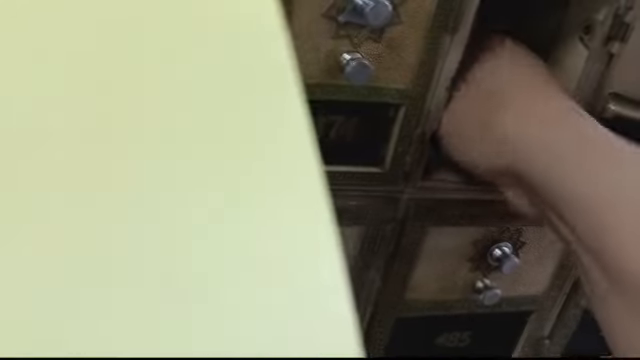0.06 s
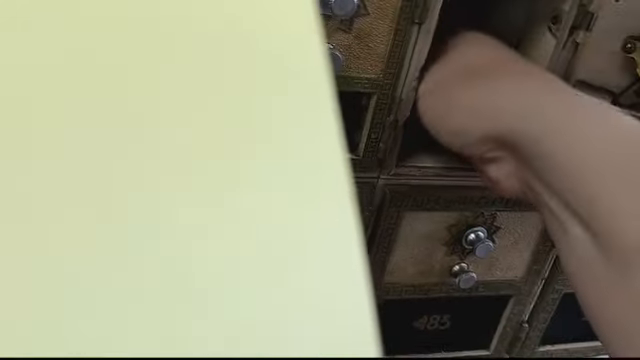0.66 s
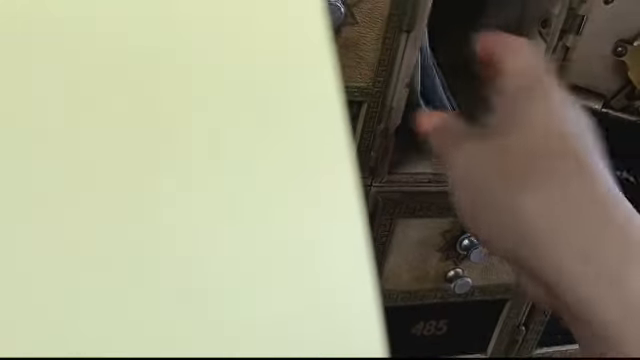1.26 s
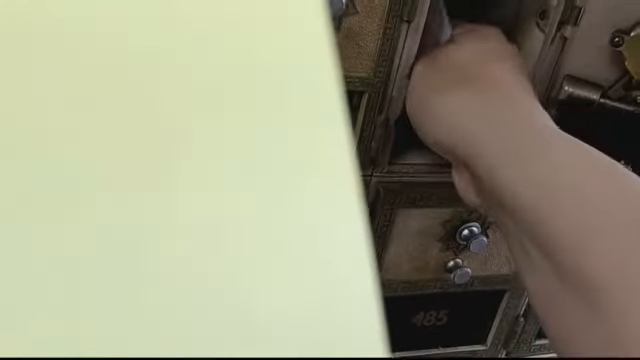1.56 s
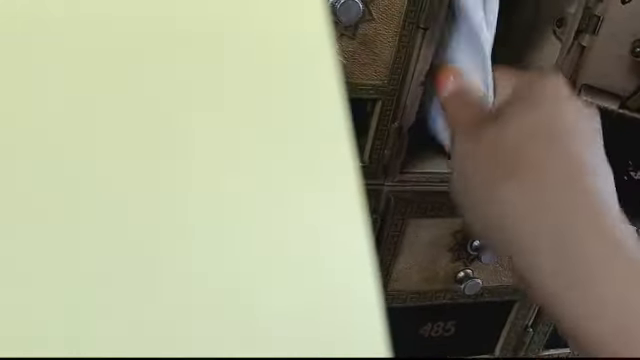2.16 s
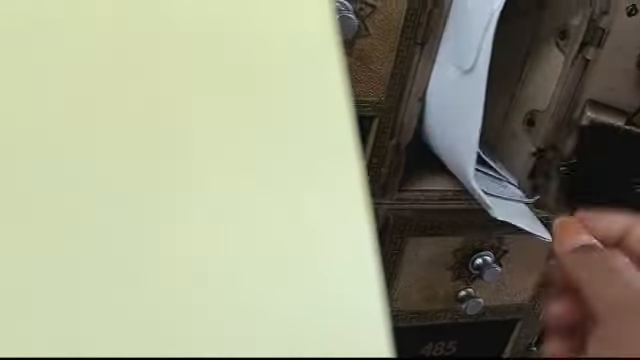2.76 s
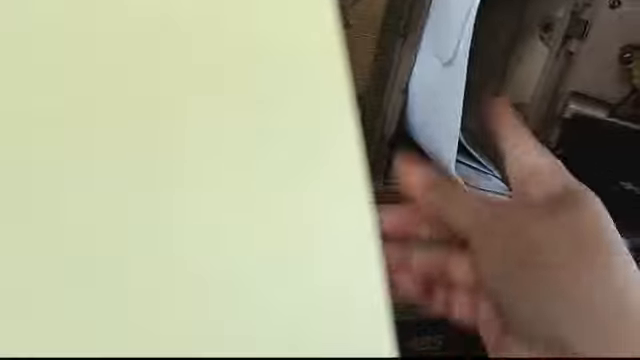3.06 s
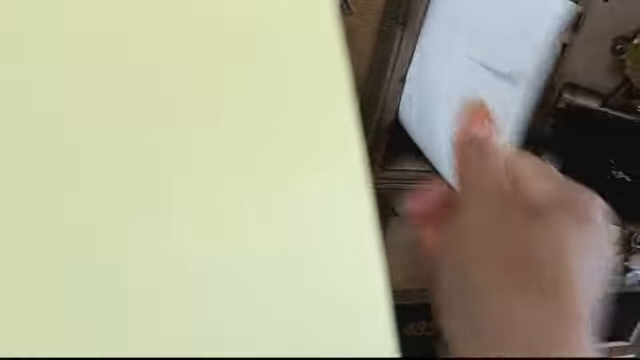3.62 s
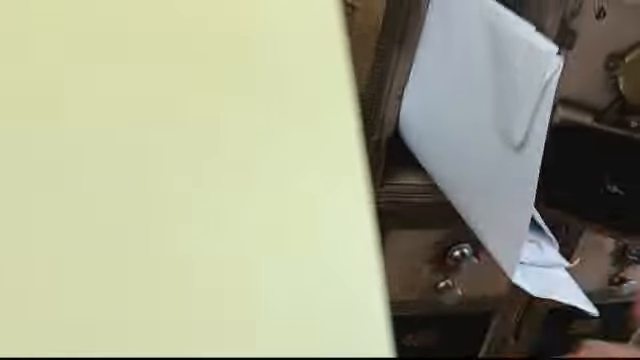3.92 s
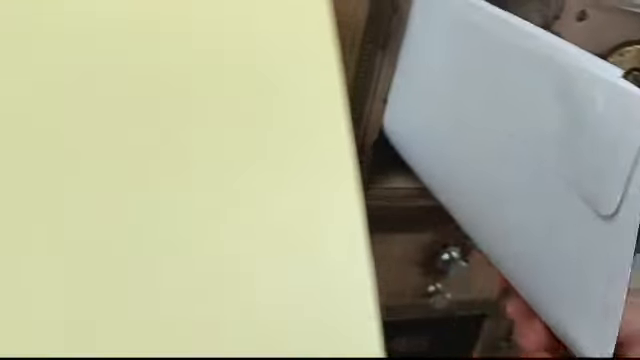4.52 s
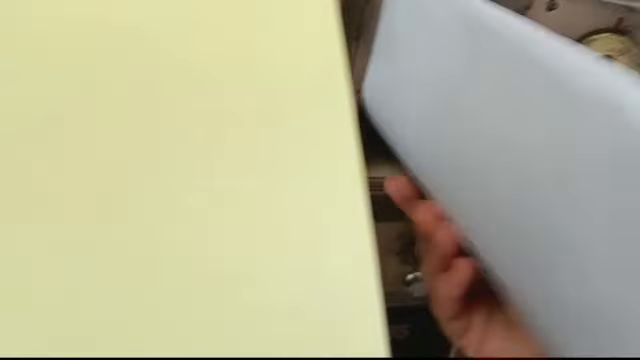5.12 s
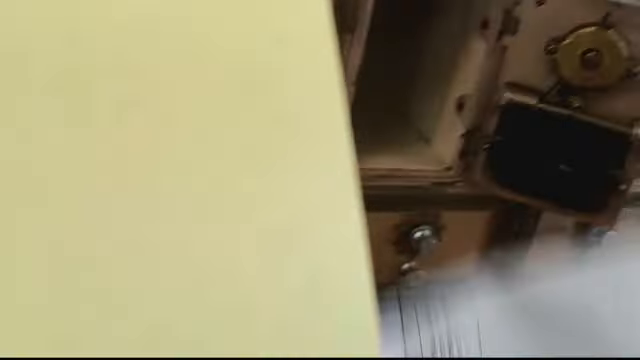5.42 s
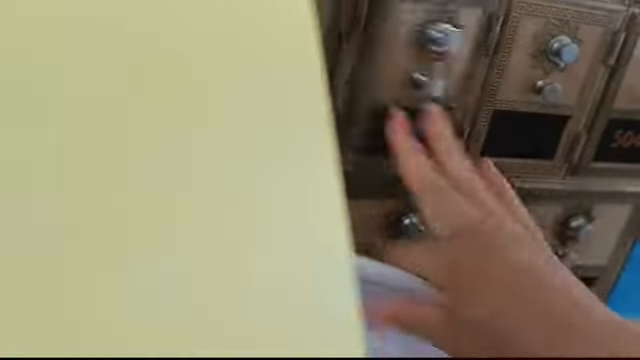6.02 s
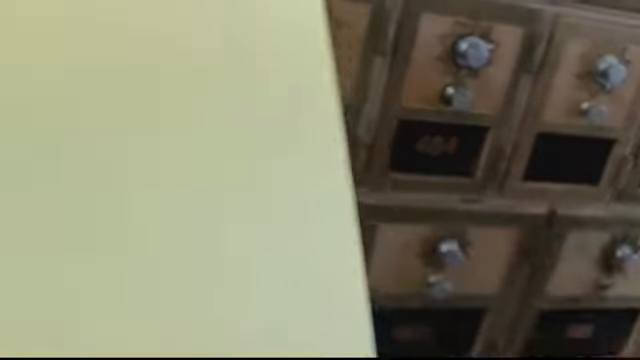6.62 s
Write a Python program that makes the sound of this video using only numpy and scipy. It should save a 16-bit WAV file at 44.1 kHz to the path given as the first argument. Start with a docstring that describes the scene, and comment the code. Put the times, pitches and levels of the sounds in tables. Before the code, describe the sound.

Close to the microphones in a quiet lobby, a hand tugs a bundle of mail from a metal mailbox. Paper slides along the inner walls, crackling and snapping irregularly, while the hand and bundle bump softly on the hollow box. After a couple of louder, fuller swishes, the small door shuts with a click, a tight thud and a short metallic rattle, followed by a faint last rustle.

```python
"""A lobby, two microphones close to a small brass mailbox. A hand works envelopes out of it: paper slides
on the inner walls, edges and creases snap, a corner taps the brass, the bundle knocks on the hollow box.
From about 4 s the paper rubs over the frame and sounds more open. At 6 s the little door is slapped shut,
the doors around it rattle, and the paper rustles once more."""
import sys
import numpy as np
from scipy import signal
from scipy.fft import rfft, irfft, next_fast_len
from scipy.io import wavfile

SR = 44100
rng = np.random.default_rng(int(sys.argv[2]) if len(sys.argv) > 2 else 0)


def materialize(psi):
    """Save the field psi as 16-bit PCM at rate SR to the path in sys.argv[1].

    A 1-D psi becomes a single channel; in a 2-D psi each row is a channel.
    """
    bounded = np.clip(np.atleast_2d(psi).T, -1, 1)
    quanta = np.round(bounded * 32767).astype(np.int16)
    wavfile.write(sys.argv[1], SR, quanta)


N = 298998
TIME = np.arange(N) / SR

# pushes and pulls that slide the paper: start_s, swell_s, ease_s, level_db, bass_offset_db, fizz_offset_db
PAPER_STROKES = [(0, 0.018, 0.11, -46, 11, -5), (0.143, 0.011, 0.071, -44, 5.5, -0.5),
                 (.23, 0.023, 0.22, -44, 7, -9), (0.383, 0.051, 0.011, -35, -2, -6),
                 (0.471, 0.17, 0.033, -41.5, 2.5, -4.5), (0.588, 0.27, 0.016, -37, -5, -1.5),
                 (0.869, 0.058, 0.069, -41.5, 6, -3), (1.355, 0.024, 0.098, -48.5, -12, -10),
                 (1.408, 0.11, 0.27, -42.5, 2, -10), (1.763, 0.024, .12, -44.5, 16, -7),
                 (1.82, 0.094, 0.15, -38.5, 1.5, -5), (1.995, .028, 0.0076, -31.5, -2.5, -6.5),
                 (2.05, 0.15, 0.095, -34.5, -0.5, -7), (2.422, .12, 0.025, -40, -3.5, -2),
                 (2.56, 0.019, 0.11, -43, 2.5, 0), (3.034, 0.22, 0.074, -35, -4.5, -2),
                 (3.44, 0.07, 0.34, -43.5, -3, -5.5), (3.64, 0.11, 0.1, -34.5, -2, -3),
                 (3.869, 0.017, 0.14, -59, -9, -8), (4.133, 0.06, 0.04, -52, -13, 3.5),
                 (4.196, 0.038, 0.0073, -36, -3.5, -6.5), (4.267, 0.076, 0.15, -34, -3, -6),
                 (4.553, 0.027, 0.2, -39, -25.5, -2.5), (4.78, 0.13, 0.021, -24.5, -7.5, -11.5),
                 (4.92, 0.093, 0.41, -43.5, -10, -1), (5.161, 0.092, 0.06, -23, -9.5, -10.5),
                 (5.32, 0.022, 0.12, -47, -15, -17), (5.482, 0.027, 0.036, -45, -41, -9.5),
                 (5.6, 0.084, 0.13, -62.5, -0.5, -13), (6.5, 0.052, 0.069, -64, 8.5, 0.5),
                 (6.633, 0.014, 0.25, -46, -14.5, 1)]
# where the paper rubs: time_s, position (0 deep in the box, 1 out at the frame)
PAPER_POSITION = [(0, 0.082), (1.0, 0.15), (2.0, 0.18), (3.7, 0.19), (4.35, .7), (4.9, 0.64)]
# the fingers bend the bundle and it crinkles instead of sliding: start_s, end_s, share (0-1)
BUNDLE_BENDS = [(.14, .4, .4), (1.42, 2.55, .3), (3.035, 3.42, .55), (4.14, 4.3, .4)]
# resonances of the box's air and walls: pitch_hz, gain_db, t60_s
BOX_RESONANCES = [(405.7, 6.5, 0.067), (793, -2, 0.018), (1109, -13, 0.033), (2266, -17.5, 0.34),
                  (3600, -11, 0.57)]
# edges and creases snapping: start_s, energy_db, bass_offset_db, fizz_offset_db, pitch_hz, decay_s
PAPER_SNAPS = [(0.151, -38, -10, -2, 3840, .004), (0.3317, -27, -25, -6, 2480, 0.0036),
               (0.4278, -20.5, -14, -20, 2230, .003), (0.9035, -24.5, -1.5, 3, 3770, 0.0018),
               (0.9811, -27, -1, -7.5, 2920, 0.015), (1.0331, -30, -4.5, -26, 2170, 0.0047),
               (1.1682, -42.5, -41, 0.5, 1690, 0.0035), (1.4, -37.5, -35.5, 0, 2630, 0.009),
               (1.463, -31.5, -26, -4, 2430, 0.0032), (1.4834, -36.5, 2, -2, 2130, 0.00088),
               (1.5827, -18, -5.5, -21, 1520, 0.00085), (1.721, -37, 7.5, -5, 2550, .002),
               (1.823, -14, -8.5, -10.5, 2440, 0.0015), (1.965, -24, -12, -8.5, 1850, 0.00099),
               (2.022, -13.5, -9, -7.5, 1860, .0026), (2.0236, -17, 4, -7, 1113, 0.0036),
               (2.1299, -10, -12, -9.5, 2020, 0.0018), (2.1788, -19, -9.5, -13.5, 1630, .0007),
               (2.2985, -29, -1.5, 3, 1830, 0.0024), (2.361, -24, -10, -7, 2220, 0.0004),
               (2.3682, -30, -4, 1.5, 5000, 0.00035), (2.423, -23, -1.5, -8.5, 1650, 0.0023),
               (2.4687, -17.5, -11.5, -9, 5700, 0.0009), (2.5261, -16.5, -17, -12, 3480, 0.0034),
               (2.5395, -22.5, -21, -3, 5620, 0.0064), (2.673, -17, -5, -14, 2250, 0.0011),
               (2.68, -27, -5, -10.5, 2330, 0.0017), (3.0337, -28, -27, -21, 2670, 0.001),
               (3.0844, -32.5, -28, -5, 3200, .002), (3.1882, -27.5, -20, -0.5, 2370, 0.0018),
               (3.2085, -18.5, -14, -10, 2080, 0.0011), (3.229, -24, -3, -14, 1870, 0.00054),
               (3.25, -18, -7, -6.5, 2860, 0.0041), (3.3573, -13, -8.5, -15.5, 2370, .0008),
               (3.383, -32.5, 6, 4, 1500, 0.0014), (3.737, -19, -4.5, -6, 2240, 0.0022),
               (3.7635, -22.5, -20, -0.5, 5660, 0.0034), (3.7704, -17, -17, -8.5, 2270, .002),
               (3.9603, -37.5, -41, -7, 2290, 0.0028), (4.1358, -46, -35, 3, 4540, 0.001),
               (4.2062, -34.5, -29, 4, 2350, 0.001), (4.7205, -14, -6, -16.5, 3000, 0.0033),
               (4.7317, -15.5, -1.5, -2.5, 2160, 0.0033), (4.8324, -19, -39, -14.5, 2770, 0.0036),
               (5.1502, -10.5, -2, -24.5, 2150, 0.0014), (5.165, -18, -23, -25, 2170, .001),
               (5.3175, -23, -7, 2, 5420, 0.0031), (5.3923, -25.5, -6.5, 0.5, 5140, 0.0014),
               (5.569, -38.5, -40, -14, 3000, .001), (5.6544, -39.5, -34, -7, 5400, 0.0027),
               (5.6911, -36, -16, -16, 2900, 0.0039), (5.802, -40, -36, -5.5, 5400, 0.0012),
               (5.846, -38, -39, -2.5, 5470, 0.0023), (5.8587, -36.5, -36, -8, 2780, 0.0011),
               (5.917, -33.5, -32, -7, 2370, 0.0012), (6.4239, -31, -27.5, -2.5, 5960, .004),
               (6.466, -39.5, -26, -12, 2780, 0.0027), (6.651, -25.5, -15.5, -11, 4160, 0.0011)]
# an envelope's edge on the wall: time_s, pitch_hz, level_db
EDGE_RASP = [(.41, 2500, -49), (.44, 2520, -44), (.48, 2600, -49.5), (.58, 2300, -48.5), (.83, 2150, -40.5),
             (.87, 2100, -73)]
# light taps on the brass, and (at 5.565 s) a long faint ring of the door's spring or hinge: start_s, level_db,
# pitch_hz, t60_s
BRASS_TAPS = [(1.168, -41.5, 1650, 0.074), (1.205, -57, 1620, 0.088), (1.357, -44.5, 1460, 0.24),
              (5.565, -59, 880, 1), (5.917, -35, 1100, 0.017)]
# the arm bumping and moving air: middle_s, length_s, level_db
ARM_BUMPS = [(1.607, 0.22, -47.5), (1.877, 0.26, -46.5), (2.29, 0.071, -46.5), (3.448, 0.086, -54.5),
             (3.863, 0.27, -60.5), (4.955, .12, -48.5), (5.17, 0.099, -43), (5.286, 0.14, -43),
             (6.596, 0.2, -66)]
# hand and bundle knocking on the box: start_s, level_db, pitch_hz, t60_s
BOX_KNOCKS = [(1.787, -22, 180, 0.088), (1.827, -30, 146.4, 0.26), (2.027, -20, 298, 0.036),
              (2.593, -26, 385, 0.073), (2.675, -24.5, 347, 0.14), (3.773, -29, 271, 0.17),
              (5.69, -40.5, 261, 0.17), (6.276, -36.5, 169, 0.12)]
# latch, then door striking the frame: start_s, energy_db, bass_offset_db, fizz_offset_db, decay_s
DOOR_HITS = [(6.0466, -15.5, -2.5, 1, .002), (6.0706, -9.5, 1.5, -8.5, 0.0016),
             (6.085, -20, -18, -18, 0.0022)]
# the brass door ringing: pitch_hz, level_db, t60_s
DOOR_RING = [(192, -27, 0.068), (2010, -35, 0.36), (2350, -51, 0.16), (3360, -51, 0.46), (5390, -46, .3)]

# spectra of the sources: frequency_hz, gain_db
IN_BOX_TONE = [(60, -34.5), (150, -31), (250, -0.5), (410, -3), (560, -7.5), (760, -6.5), (930, -14.5),
               (1300, -4.5), (1800, 1), (2300, 3.5), (3100, -2), (4500, -7), (10000, -18.5), (16000, -22)]  # paper deep in the box
AT_FRAME_TONE = [(60, -22), (150, -11.5), (270, 8), (420, 11), (620, 3), (1000, 3), (1900, 5.5), (2600, 7),
                 (4000, -3), (7000, -5.5), (10000, -14.5), (16000, -11)]  # paper on the frame
CREASE_TONE = [(60, -48), (200, -14), (400, 4), (900, 0.5), (2400, 13), (5000, 1.5), (10000, -3.5),
               (16000, -9.5)]
ARM_TONE = [(15, -8.5), (35, 1), (70, 8.5), (160, -8.5), (250, 0), (500, -22), (2000, -71.5)]
SLAM_TONE = [(30, -5), (140, -3), (280, 8), (600, 1), (1000, -5.5), (1600, -8), (2500, -0.5), (4000, -10.5),
             (7000, -17), (11000, -21.5), (16000, -28)]
LOBBY_AIR_TONE = [(15, -23), (30, -6.5), (75, 7), (190, -29), (690, -17.5), (900, -11), (1200, -43.5),
                  (2800, -22.5), (7000, -54), (16000, -47.5)]
# the lobby's reverberation: frequency_hz, t60_s
LOBBY_T60 = [(100, 0.57), (400, 0.37), (1200, 0.28), (3000, 0.42), (8000, 0.4), (16000, 0.19)]
# how alike the two microphones hear a sound: frequency_hz, likeness (0-1)
MIC_LIKENESS = [(40, 0.78), (100, 0.97), (300, 1), (600, 0.95), (1500, 0.55), (4500, 0.076), (10000, 0.1)]
# responses of the microphones: frequency_hz, gain_db
LEFT_RESPONSE = [(60, 2.5), (300, 0.5), (700, 1), (1200, -0.5), (2200, -4.5), (4000, 1), (8800, 1),
                 (9600, -6), (12000, -24.5), (16000, -18)]
RIGHT_RESPONSE = [(60, -1.5), (300, -5.5), (700, -7.5), (1200, 2), (2300, 3.5), (4000, 1.5), (8200, 2),
                  (9300, 12), (10100, 19), (11000, 13), (12500, 5.5), (16000, -1)]
# filters for bass, middle and fizz, divided at 800 and 6000 Hz
REGISTER_FILTERS = [signal.butter(4, hz, kind, fs=SR, output="sos")
                    for hz, kind in [(800, "low"), ((800, 6000), "band"), (6000, "high")]]


def amp(db):
    """Decibels to gain."""
    return 10 ** (np.asarray(db) / 20)


def unit_rms(x):
    """Scales to rms 1."""
    return x / np.sqrt(np.mean(x ** 2) + 1e-20)


def at_hz(points, hz):
    """A spectrum table at the given frequencies."""
    frequency, value = np.transpose(points)
    return np.interp(np.log(hz + 1), np.log(frequency + 1), value)


def curves(rows):
    """Each column of a time table at every sample."""
    time_s, *columns = np.transpose(rows)
    return [np.interp(TIME, time_s, column) for column in columns]


def add(mix, start_s, sound):
    """Mixes a sound in at start_s."""
    part = mix[:, max(round(start_s * SR), 0):][:, :sound.shape[-1]]
    part += sound[..., :part.shape[1]]


def colour(x, points, size=4096):
    """Minimum-phase filter with the given spectrum."""
    log_gain = np.log(amp(at_hz(points, abs(np.fft.fftfreq(size, 1 / SR)))))
    taps = np.fft.ifft(np.exp(np.conj(signal.hilbert(log_gain)))).real[:size // 2]
    return signal.fftconvolve(x, taps[None], axes=1)[:, :x.shape[1]]


def noise(size):
    """White noise at two microphones, alike in the bass and unlike in the treble."""
    left, other = rfft(rng.standard_normal((2, next_fast_len(size))))
    likeness = at_hz(MIC_LIKENESS, np.linspace(0, SR / 2, len(left)))
    right = likeness * left + np.sqrt(1 - likeness ** 2) * other
    return irfft(np.array([left, right]))[:, :size]


def noise_band(hz, width_hz):
    """Noise in a resonance that follows the curve hz."""
    turn = np.exp(2j * np.pi * np.cumsum(hz) / SR)
    pole = np.exp(-np.pi * width_hz / SR)
    narrow = signal.lfilter([1], [1, -2 * pole, pole * pole], noise(len(hz)) / turn)
    return unit_rms((turn * narrow).real)


def registers(x):
    """Bass, middle and fizz of a sound, each at rms 1."""
    return [unit_rms(signal.sosfilt(sos, x)) for sos in REGISTER_FILTERS]


def burst(decay_s, flutter=0, flutter_s=1, size=2048):
    """A sharp crack, with an optional weaker flutter of the struck sheet."""
    t = np.arange(size) / SR
    return noise(size) * (np.exp(-t / decay_s) + flutter * np.exp(-t / flutter_s))


def blow(x, energy_db, bass_db, fizz_db):
    """Gives each register of a blow its energy, counted over one millisecond."""
    bass, middle, fizz = registers(x)
    length_ms = 1000 * x.shape[1] / SR
    return amp(energy_db) / np.sqrt(length_ms) * (amp(bass_db) * bass + middle + amp(fizz_db) * fizz)


def mode(db, hz, t60_s, rise_s=0.0057):
    """One dying vibration."""
    t = TIME[:SR // 2]
    return amp(db - 60 * t / t60_s) * np.sin(2 * np.pi * hz * t) * (1 - np.exp(-t / rise_s))


def grains(tone, per_s, spread_db, decay_s, hiss):
    """Many tiny slips of uneven size, each a short puff, over a share of smooth hiss."""
    slips = (rng.random(N) < per_s / SR) * amp(spread_db * np.minimum(rng.exponential(1, N), 4)) ** 2
    power = signal.lfilter([1], [1, -np.exp(-2 / (decay_s * SR))], slips)
    return unit_rms(colour(noise(N) * np.sqrt(power / power.mean() + hiss), tone))


def pressure_db(t, swell_s, ease_s, grip_s=0.002, arch=1.37, release_db_per_s=419):
    """Level of one stroke against its peak: the paper catches at once, swells, eases and stops quickly."""
    catch = 20 * np.log10(np.clip(t / grip_s, 1e-6, 1))
    swell = 9 * np.clip(1 - t / swell_s, 0, 1) ** arch
    ease = 8 * np.clip((t - swell_s) / ease_s, 0, 1) ** arch
    release = release_db_per_s * np.clip(t - swell_s - ease_s, 0, 1)
    return catch - swell - ease - release


def flexing(x, depth_db=4, span_hz=109, span_s=0.0079):
    """A bending sheet keeps shifting its resonances: random patches over time and frequency."""
    hz, time_s, spectrum = signal.stft(x, SR, nperseg=512)
    patches = rng.standard_normal(spectrum.shape[1:])
    for axis, pole in enumerate([np.exp(-hz[1] / span_hz), np.exp(-time_s[1] / span_s)]):
        patches = signal.lfilter([1], [1, -2 * pole, pole * pole], patches, axis=axis)
    spectrum *= amp(depth_db * np.clip(unit_rms(patches), -2, 2))
    return unit_rms(signal.istft(spectrum, SR, nperseg=512)[1][:, :N])


def crinkles(per_s, spread_db=6, decay_s=0.0007):
    """Separate little creases giving way, of uneven size."""
    creases = (rng.random(N) < per_s / SR) * amp(spread_db * rng.uniform(-1, 1, N))
    return unit_rms(noise(N) * signal.lfilter([1], [1, -np.exp(-1 / (decay_s * SR))], creases))


def paper_sliding(outside, gain_db=-2, bass_trim_db=-1, crackle_db=-9.5):
    """Paper fibres catch and slip; deep in the box the cavity colours them, at the frame they sound open."""
    power = np.zeros((3, N))
    for start_s, swell_s, ease_s, level_db, bass_db, fizz_db in PAPER_STROKES:
        span = slice(round(start_s * SR), round((start_s + swell_s + ease_s + 0.5) * SR))
        press = pressure_db(TIME[span] - start_s, swell_s, ease_s)
        bass = bass_db + bass_trim_db + 1.17 * press  # bass and fizz grow faster than the middle
        fizz = fizz_db + 1.19 * press
        power[:, span] += amp(level_db + np.array([bass, press, fizz])) ** 2
    in_box = grains(IN_BOX_TONE, per_s=700, spread_db=0.5, decay_s=0.0028, hiss=1)
    at_frame = grains(AT_FRAME_TONE, per_s=1100, spread_db=3, decay_s=0.00084, hiss=0.64)
    rub = flexing(np.sqrt(1 - outside) * in_box + np.sqrt(outside) * at_frame)
    tiny_creases = np.gradient(crinkles(per_s=42), axis=1)  # these radiate mostly treble
    crackle = unit_rms(colour(tiny_creases, IN_BOX_TONE))
    crumple = unit_rms(colour(crinkles(per_s=130), IN_BOX_TONE))
    bent = sum(share * (TIME > start_s) * (TIME < end_s) for start_s, end_s, share in BUNDLE_BENDS)
    texture = np.sqrt(1 - bent) * rub + np.sqrt(bent) * crumple
    texture += amp(crackle_db) * np.sqrt(1 - outside) * crackle
    return amp(gain_db) * sum(gain * band for gain, band in zip(np.sqrt(power), registers(texture)))


def box_resonance(x):
    """The mailbox's air and walls ring along with whatever moves inside."""
    ringing = 0
    for hz, gain_db, t60_s in BOX_RESONANCES:
        q = hz * t60_s * np.pi / np.log(1000)
        ringing += amp(gain_db) * signal.lfilter(*signal.iirpeak(hz, q, fs=SR), x)
    return x + ringing


def arm_rumble(stir_db=-70.5):
    """The arm bumps and moves air, and never keeps quite still."""
    bumps = sum(amp(level_db) * np.exp(-8 * ((TIME - middle_s) / length_s) ** 2)
                for middle_s, length_s, level_db in ARM_BUMPS)
    return (amp(stir_db) + bumps) * unit_rms(colour(noise(N), ARM_TONE))


def paper_snaps(patch_q=4.5, patch_gain=1.97, strain_db=-17, strain_s=0.0039, stiff_db=-22):
    """Each snap rings a small, well damped patch of paper; the strong ones strain for a moment first."""
    out = np.zeros((2, N))
    for start_s, energy_db, bass_db, fizz_db, hz, decay_s in PAPER_SNAPS:
        crack = colour(burst(decay_s, flutter=0.068, flutter_s=0.016), CREASE_TONE)
        patch = signal.lfilter(*signal.iirpeak(hz, patch_q, fs=SR), crack)
        add(out, start_s, blow(crack + patch_gain * patch, energy_db, bass_db, fizz_db))
        strain = colour(burst(strain_s, size=512)[:, ::-1], CREASE_TONE)  # swells into the snap
        strain_energy_db = energy_db + strain_db + min(energy_db - stiff_db, 0)
        add(out, start_s - strain.shape[1] / SR, blow(strain, strain_energy_db, bass_db, fizz_db))
    return out


def edge_rasp(width_hz=600):
    """An envelope's edge scrapes along the inner wall, lower as more of it bends free."""
    hz, level_db = curves(EDGE_RASP)
    touching = (TIME > EDGE_RASP[0][0]) * (TIME < EDGE_RASP[-1][0])
    return amp(level_db) * noise_band(hz, width_hz) * touching


def brass_taps(width_hz=320, gain_db=-3):
    """Fingers and envelope corners touch the brass, which rings in a cluster of modes; once, the door's spring
    or hinge rings long and faint."""
    out, t = np.zeros((2, N)), TIME[:SR // 2]
    for start_s, level_db, hz, t60_s in BRASS_TAPS:
        cluster = noise_band(np.full(len(t), hz), width_hz)
        add(out, start_s, cluster * amp(level_db + gain_db - 60 * t / t60_s))
    return out


def box_knocks(partner_ratio=0.98, partner_db=-7, thump_db=-9, thump_t60_s=0.079, thump_rise_s=0.002):
    """Soft blows boom in a close pair of box modes, with a rough thump."""
    out, t = np.zeros((2, N)), TIME[:SR // 2]
    for start_s, level_db, hz, t60_s in BOX_KNOCKS:
        boom = mode(level_db, hz, t60_s) + mode(level_db + partner_db, hz * partner_ratio, t60_s / 2)
        envelope = amp(level_db + thump_db - 60 * t / thump_t60_s) * np.minimum(t / thump_rise_s, 1)
        thump = envelope * noise_band(np.full(len(t), hz), width_hz=260)
        add(out, start_s, boom + thump)
    return out


def door_slam():
    """The latch clicks past, the door hits the frame with a tight thud and rings; its neighbours rattle."""
    latch_s, slam_s = DOOR_HITS[0][0], DOOR_HITS[1][0]
    out = neighbours_rattle(slam_s)
    for start_s, energy_db, bass_db, fizz_db, decay_s in DOOR_HITS:
        hit = colour(burst(decay_s, flutter=0.35, flutter_s=0.017), SLAM_TONE)
        add(out, start_s, blow(hit, energy_db, bass_db, fizz_db))
    bolt = colour(burst(decay_s=0.0049)[:, ::-1], SLAM_TONE)  # rides up its ramp before it clicks
    add(out, latch_s - bolt.shape[1] / SR, blow(bolt, energy_db=-42, bass_db=0, fizz_db=0))
    thud = mode(db=-9, hz=185, t60_s=0.027, rise_s=0.00041)
    ring = sum(mode(level_db, hz, t60_s) for hz, level_db, t60_s in DOOR_RING)
    add(out, slam_s, thud + ring)
    small_panel = signal.butter(2, 115, "high", fs=SR)  # too small to radiate deep bass
    return signal.lfilter(*small_panel, out)


def neighbours_rattle(slam_s, build_s=0.066, rattle_t60_s=0.27, settle_t60_s=1.8, drone_t60_s=1.05):
    """The slam spreads along the wall: other doors chatter, loose ones settle, the empty boxes drone."""
    t = np.maximum(TIME - slam_s, 0)
    build = np.minimum(t / build_s, 1) ** 2
    dying_s = np.maximum(t - build_s, 0)
    rattle = amp(-27 - 60 * dying_s / rattle_t60_s)
    settle = amp(-47.5 - 60 * dying_s / settle_t60_s)
    chatter = (rattle + settle) * grains(SLAM_TONE, per_s=300, spread_db=3, decay_s=0.003, hiss=1)
    drone = amp(-39 - 60 * dying_s / drone_t60_s) * noise_band(hz=np.full(N, 300), width_hz=380)
    return build * (chatter + drone)


def lobby_reverb(x, echoes_per_s=3000, near_db=-13, near_decay_s=0.0029, tail_db=-15):
    """Quick reflections off the wall of boxes, then the lobby's tail."""
    size = SR // 2
    t = TIME[:size]
    echoes = rng.choice([-1., 1.], (2, size)) * (rng.random((2, size)) < echoes_per_s / SR)
    near = echoes * (t > 0.0015) * np.exp(-t / near_decay_s)
    hz, time_s, spectrum = signal.stft(echoes * (t > 0.012), SR, nperseg=256)
    spectrum *= amp(-60 * time_s / at_hz(LOBBY_T60, hz)[:, None])
    tail = signal.istft(spectrum, SR, nperseg=256)[1][:, :size]
    response = (amp(near_db) * unit_rms(near) + amp(tail_db) * unit_rms(tail)) / np.sqrt(size)
    return x + signal.fftconvolve(x, response, axes=1)[:, :N]


def scene(air_db=-69):
    """All the handling at the mailbox, close up, over the quiet air of the lobby."""
    outside = curves(PAPER_POSITION)[0]
    paper = paper_sliding(outside) + edge_rasp() + paper_snaps()
    paper = outside * paper + (1 - outside) * box_resonance(paper)  # less box as the bundle leaves it
    handling = paper + arm_rumble() + box_knocks() + brass_taps() + door_slam()
    return lobby_reverb(handling) + amp(air_db) * unit_rms(colour(noise(N), LOBBY_AIR_TONE))


def record(dry, left_lag_samples=36, cutoff_hz=15900):
    """The left microphone is farther and muffled, the right one rings in the treble; then the band limit."""
    delayed = np.pad(dry[:1], ((0, 0), (left_lag_samples, 0)))[:, :N]
    left = colour(delayed, LEFT_RESPONSE)
    right = colour(dry[1:], RIGHT_RESPONSE)
    clipped = np.clip(np.vstack([left, right]), -1, 1)
    lowpass = signal.firwin(255, cutoff_hz, window=("kaiser", 8), fs=SR)
    return signal.oaconvolve(clipped, lowpass[None], "same")


dry = scene()
out = record(dry)
materialize(out)
```